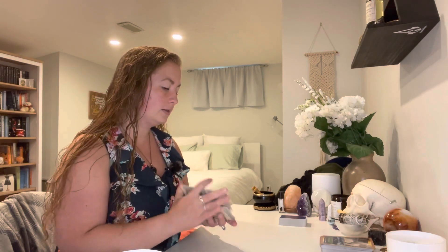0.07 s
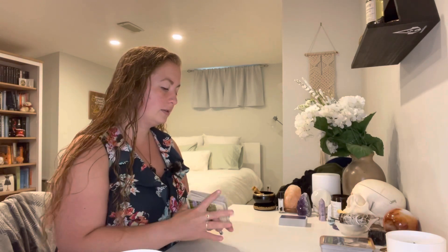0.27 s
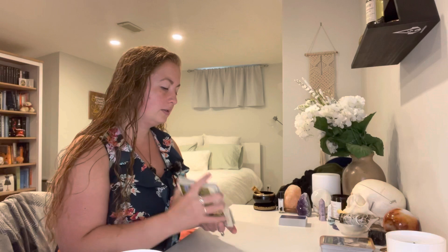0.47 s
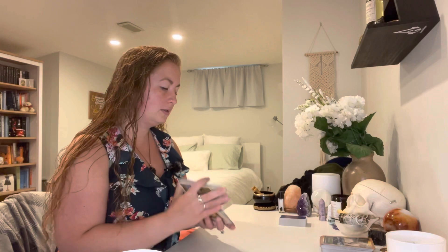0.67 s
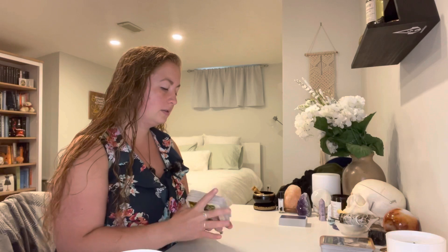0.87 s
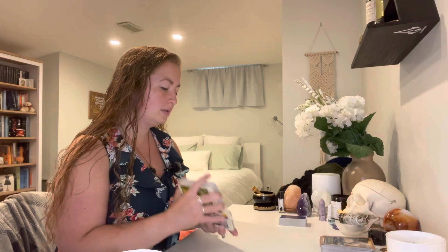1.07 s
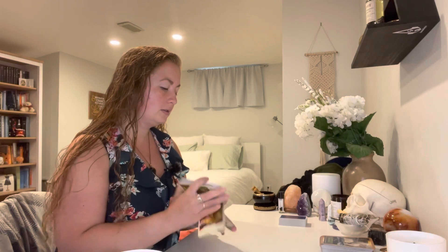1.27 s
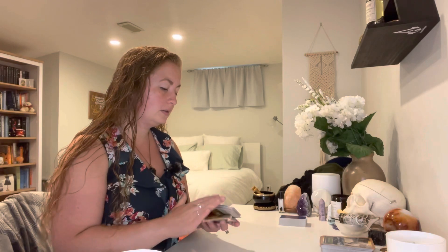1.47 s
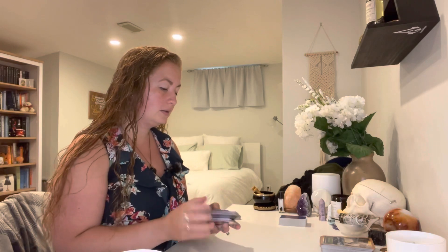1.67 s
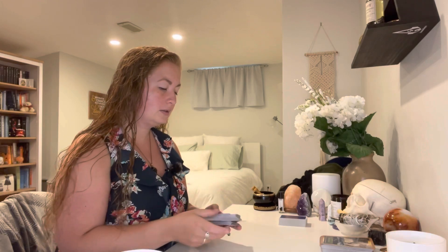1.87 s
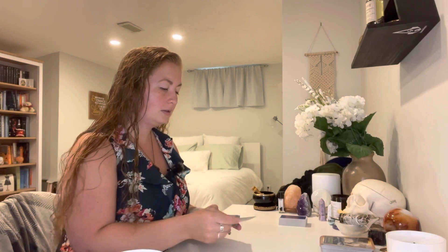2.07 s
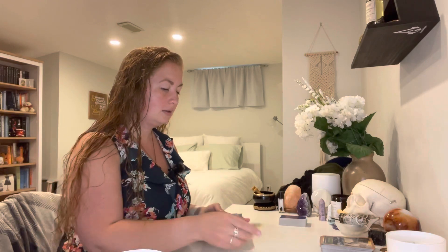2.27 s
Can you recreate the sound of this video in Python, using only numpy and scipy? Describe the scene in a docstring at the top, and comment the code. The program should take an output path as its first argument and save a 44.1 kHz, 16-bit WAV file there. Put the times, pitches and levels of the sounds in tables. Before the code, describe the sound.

Card shuffling in a small furnished room, heard close: scattered snaps and gritty slides, the strongest rapid snaps just after one second, then soft thuds, a small knock and rustling, with low air bumps and faint hum.

```python
"""Overhand card shuffle, close by

A deck of cards is shuffled overhand in a quiet furnished room, one metre from the microphone.
Snaps are random chatter ringing the packet and the deck; slides are gritty hiss with a duller body.
Thuds are short rounded tones, rustle is lumpy low noise, arm strokes are slow pressure bumps.
Behind them lie a low room rumble and a faint steady hum; the hands and cards get a short room tail."""
import sys
import numpy as np
from scipy import signal
from scipy.fft import rfft, irfft
from scipy.io import wavfile
from scipy.ndimage import uniform_filter1d

SR = 44100
rng = np.random.default_rng(int(sys.argv[2]) if len(sys.argv) > 2 else 0)


def ratio(d):
    """dB to gain"""
    e = np.asarray(d, float) / 20
    return 10 ** e


def unload_audio(sound):
    """Save the sound as a 16-bit wav file, at the path given as the first command line argument."""
    columns = np.transpose(np.atleast_2d(sound))
    # keep every value between -1 and 1, then stretch to whole-number steps
    steps = np.round(np.clip(columns, -1, 1) * 32767)
    wavfile.write(sys.argv[1], SR, steps.astype(np.int16))


N = 102267  # length in samples


def curve(table, column):
    """A column of a time table, interpolated at every sample."""
    points = np.array(table, float)
    return np.interp(np.arange(N) / SR, points[:, 0], points[:, column])


def band(x, hz, width_hz):
    """Two-pole resonance, gain 1 at the centre."""
    hz = min(hz, 0.45 * SR)
    b, a = signal.iirpeak(hz, hz / width_hz, fs=SR)
    return signal.lfilter(b, a, x)


def wide_band_noise(hz, width_hz, second_width_hz):
    """Noise of rms 1 through two resonances at one centre."""
    noise = band(band(rng.standard_normal(N), hz, width_hz), hz, second_width_hz)
    return noise / noise.std()


def coloured(points):
    """Noise of rms 1 with a spectrum of (Hz, dB) points, joined over log frequency."""
    table = np.array(points, float)
    f = np.fft.rfftfreq(N, 1 / SR) + 1e-3  # keeps log(0) away
    gain_db = np.interp(np.log(f), np.log(table[:, 0]), table[:, 1])
    noise = irfft(rfft(rng.standard_normal(N)) * ratio(gain_db), N)
    return noise / noise.std()


def walk(rate_hz):
    """Random levels, one per 1 / rate_hz seconds, slewed from each to the next; spread near 1."""
    hold = int(SR / rate_hz)
    steps = np.repeat(rng.standard_normal(N // hold + 1), hold)
    return 1.2 * uniform_filter1d(steps, hold)[:N]


def add(out, at, x):
    """Mix x into out from time at (s)."""
    i = max(int(at * SR), 0)
    out[i:i + len(x)] += x[:max(N - i, 0)]


# spectrum of the empty room at the microphone: f/Hz, relative density level/dB
ROOM_SPECTRUM = [(12, -42), (20, -6), (38, -17), (65, -21.5), (130, -32.5), (200, -43), (310, -40.5),
                 (500, -45), (1000, -43), (1800, -49.5), (3000, -59.5), (6000, -68), (16000, -76)]


def room_floor():
    """Low room rumble of gently wandering level, plus a faint steady sine hum."""
    level_db, wander_db, wander_hz = -39, 0.83, 5.57
    hum_hz, hum_peak_db = 121.4, -53.5
    rumble = ratio(level_db + wander_db * walk(wander_hz)) * coloured(ROOM_SPECTRUM)
    hum = ratio(hum_peak_db) * np.sin(2 * np.pi * hum_hz * np.arange(N) / SR)
    return rumble + hum


def room(x):
    """Diffuse reflections decaying exponentially, duller than the direct sound."""
    t60_s, first_echo_s = 0.29, 0.004
    level_db, top_hz = -16.5, 7040
    t = np.arange(SR // 2) / SR
    tail = rng.standard_normal(len(t)) * 1000.0 ** (-t / t60_s) * (t > first_echo_s)
    b, a = signal.butter(1, top_hz, fs=SR)
    tail = signal.lfilter(b, a, tail)
    tail /= np.sqrt(np.sum(tail ** 2))
    return ratio(level_db) * signal.fftconvolve(x, tail)[:N]


# arm strokes pushing air: centre t/s, pressure peak (full scale 1), width scale/s
STROKES = [(0.101, 0.25, 0.042), (0.278, 0.22, 0.033), (0.402, 0.24, 0.051), (0.518, 0.25, .035),
           (0.742, 0.33, 0.043), (0.888, 0.18, 0.031), (1.031, 0.19, 0.052), (1.342, 0.27, 0.048),
           (1.602, 0.23, 0.0373), (1.852, 0.27, 0.043), (2.101, 0.067, 0.039), (2.35, 0.24, 0.036)]


def strokes():
    """Each arm stroke: a pressure bump flanked by suction."""
    t = np.arange(N) / SR
    out = np.zeros(N)
    for at, peak, width in STROKES:
        swing = 1 - ((t - at) / width / 1.332) ** 2  # below zero on either side
        out += peak * swing * np.exp(-0.5 * ((t - at) / width / 1.317) ** 2)
    return out


# hand and sleeve rustle in the low mids: t/s, level/dB
RUSTLE = [(0, -46), (.1, -49), (.45, -52.5), (.55, -51), (.75, -50.5), (.85, -56), (1.0, -50.5), (1.3, -44),
          (1.5, -54), (1.63, -51), (1.75, -50), (1.85, -54.5), (1.97, -48), (2.04, -52), (2.11, -48.5),
          (2.16, -43.5), (2.22, -42.5), (2.27, -47.5), (2.32, -45)]


def rustle():
    """Skin and cloth moving: a soft lumpy low noise."""
    hz, width_hz = 120, 320
    lump_db, lump_hz = 1.54, 40.22
    noise = wide_band_noise(hz, width_hz, width_hz)
    return ratio(curve(RUSTLE, 1) + lump_db * walk(lump_hz)) * noise


# soft hand thuds and knuckle knocks: t/s, envelope peak level/dB, f/Hz, length/s (peak at half of it)
THUDS = [(.02, -36.5, 216, .012), (.763, -40.5, 207, 0.0062), (1.045, -31.5, 167, 0.0088),
         (1.631, -40, 520, .004), (1.635, -32.5, 188, 0.0086), (1.722, -47, 2660, .012),
         (1.652, -40.5, 340, 0.0054), (1.969, -30.5, 96, 0.013), (2.074, -25.5, 1324, 0.0051),
         (2.075, -23, 520, 0.0015), (2.081, -34, 474, 0.011), (2.30, -40, 159, .02)]


def thuds():
    """Soft flesh contact: a rounded push that rings briefly."""
    out, t = np.zeros(N), np.arange(SR // 5) / SR
    for at, db, hz, length in THUDS:
        rise = t / (length / 2)
        push = np.e * rise * np.exp(-rise)  # peaks at 1
        add(out, at, ratio(db) * push * np.sin(2 * np.pi * hz * t))
    return out


# cards sliding on each other: t/s, hiss level/dB, body level/dB against the hiss
SLIDE = [(0, -50.5, 8), (.06, -55, 4), (.1, -50.5, -2), (.135, -70.5, 5), (.22, -75.5, 12.5),
         (.28, -59, 3.5), (.35, -60.5, 5.5), (.385, -57.5, -6), (.43, -51, -29), (.446, -54, -13),
         (.51, -76.5, 14), (.55, -62.5, -21), (.61, -66, 3), (.64, -50, 1), (.69, -55.5, 4.5),
         (.73, -52, -17), (.77, -76, 0), (.88, -70, 4.5), (.925, -59.5, 1), (.97, -58.5, 2),
         (1.035, -54.5, -6.5), (1.07, -65.5, 6), (1.14, -88, -17), (1.18, -47.5, 12), (1.23, -47.5, 16),
         (1.3, -56, 15.5), (1.38, -65.5, 9.5), (1.42, -79, 14.5), (1.47, -60.5, 15), (1.52, -88, 19.5),
         (1.627, -88, -15), (1.631, -59, 8.5), (1.66, -58, 7.5), (1.7, -59.5, 3), (1.76, -75, 17),
         (1.8, -93, 15), (1.92, -74.5, 13), (1.97, -62, 6.5), (2.06, -52.5, -5), (2.11, -67.5, 2.5),
         (2.16, -83, 0), (2.29, -96, 9), (2.32, -52, 3)]
# spectrum of the paper hiss: f/Hz, relative density level/dB
HISS = [(1470, -24.5), (2500, 5.5), (2740, -6), (5610, -1), (6700, -7.5), (10200, 1), (14500, -5),
        (16000, -26)]


def slide():
    """Paper on paper: gritty bright hiss with a duller body."""
    body_hz, body_width_hz = 1930, 2940
    body = wide_band_noise(body_hz, body_width_hz, 2 * body_width_hz)
    grit = ratio(-1 * walk(500) + 1.3 * walk(60))  # fast and slower flutter, in dB
    hiss = coloured(HISS)
    return ratio(curve(SLIDE, 1)) * grit * (hiss + ratio(curve(SLIDE, 2)) * body)


# card snaps: t/s, ring level/dB, ring f/Hz of the struck packet, crack level/dB against the ring,
# chatter decay constant/s
SNAPS = [(.001, -35.5, 620, -26, 0.0096), (0.025, -29, 1730, -5.5, 0.0081), (0.348, -43, 2640, -9, 0.012),
         (0.4396, -30, 1500, 0, .0012), (0.455, -38, 2270, -23, 0.005), (0.627, -42, 1180, -6, 0.0024),
         (0.6357, -16.5, 2310, -15, 0.0011), (0.643, -24, 1000, -8, 0.009), (0.653, -32, 1700, -9, 0.0035),
         (0.657, -31.5, 2500, -20, .005), (0.677, -44, 2580, -4, 0.0034), (0.917, -50.5, 2880, -5, 0.0086),
         (1.035, -44, 9000, -7.5, .004), (1.0425, -29.5, 750, -19, .004), (1.053, -43.5, 1500, -17.5, .003),
         (1.1479, -20.5, 1667, -19, 0.0021), (1.172, -14.5, 1200, -4.5, 0.0025),
         (1.1741, -27.5, 1000, 6, 0.0013), (1.18, -26.5, 2500, -19.5, 0.0018),
         (1.194, -18, 1200, -32.5, 0.0056), (1.2003, -7, 1530, -7, 0.0023),
         (1.2085, -14.5, 2130, -16.5, 0.004), (1.2125, -21, 2400, -20.5, 0.0076),
         (1.2214, -15.5, 2400, -36.5, 0.0013), (1.2242, -20.5, 2200, -14, 0.0017),
         (1.236, -21.5, 1480, -22, .005), (1.355, -39.5, 2700, -11, 0.0085),
         (1.635, -50, 2850, -5.5, 0.0021), (1.72, -33, 1540, -6.5, 0.0055), (1.728, -39, 870, -4, 0.0044),
         (1.858, -46.5, 8950, -15, 0.0031), (1.862, -39.5, 1130, -10, 0.0052),
         (2.075, -30, 1370, -19.5, 0.0022), (2.083, -34.5, 1320, -28, 0.0047),
         (2.135, -45.5, 1530, -24, 0.0034), (2.305, -51, 3940, 9.5, 0.0028)]
# modes of the deck in the hand: f/Hz, relative level/dB, 60 dB decay time/s before the cap in snaps()
DECK = [(225, -20.5, .03), (340, -1, .03), (520, 5.5, 0.086), (686, 2.5, 0.061), (990, 2, 0.02),
        (1564, -9, 0.06), (2200, -14.5, 0.02), (4520, 16, 0.011)]


def unit(x):
    """Scale a burst to the energy of 2 ms at rms 1."""
    return x / np.sqrt(np.sum(x ** 2) / (0.002 * SR))


def deck_knock(t):
    """Decaying modes of the held deck, each shifted a little in pitch as the grip varies."""
    t60_max_s, pitch_scatter = 0.028, 0.06
    grip = 1 + pitch_scatter * rng.standard_normal(len(DECK))
    out = np.zeros(len(t))
    for (hz, db, t60), shift in zip(DECK, grip):
        decay = 1000.0 ** (-t / min(t60, t60_max_s))
        out += ratio(db) * np.sin(2 * np.pi * hz * shift * t) * decay
    return out


def snaps():
    """Several card edges land within a few ms: sharp chatter rings the packet, cracks and knocks the deck."""
    ring_q, rise_s, knock_db = 1.2, 0.00035, -7  # knock level is against the ring
    crack_hz, crack_width_hz = 4760, 5450
    out, t = np.zeros(N), np.arange(SR // 8) / SR
    for at, db, hz, crack_db, length in SNAPS:
        sign, size = rng.standard_normal((2, len(t)))
        decay_s = max(length, 3e-4)
        edges = np.sign(sign) * ratio(7.4 * np.clip(size, -2, 2))  # uneven impacts
        edges *= np.exp(-t / decay_s) * np.minimum(t / rise_s, 1)
        ring = band(band(edges, hz, hz / ring_q), hz, 2 * hz)
        crack = band(band(edges, crack_hz, crack_width_hz), crack_hz, 2 * crack_width_hz)
        push = np.exp(-t / decay_s * 20)  # much shorter than the chatter
        knock = signal.fftconvolve(push, deck_knock(t))[:len(t)]
        snap = unit(ring) + ratio(crack_db) * unit(crack) + ratio(knock_db) * unit(knock)
        add(out, at, ratio(db) * snap)
    return out


def scene():
    """Hands and cards with their room tail, over arm strokes and the room floor."""
    cards = snaps() + slide() + thuds() + rustle()
    return (cards + room(cards) + strokes() + room_floor())[None]  # one channel


def band_limit(x):
    """A steep low-pass at the top of the band."""
    return signal.sosfilt(signal.butter(12, 16490, fs=SR, output="sos"), x)


def record(dry):
    """The recorder rounds the loudest peaks and cuts the top."""
    top_hz, ceiling = 15800, 1.5
    rounded = ceiling * np.tanh(dry / ceiling)
    low_pass = signal.ellip(8, 0.2, 40, top_hz, fs=SR, output="sos")
    mix = signal.sosfilt(low_pass, rounded)
    return band_limit(mix)


dry = scene()
out = record(dry)
unload_audio(out)
```